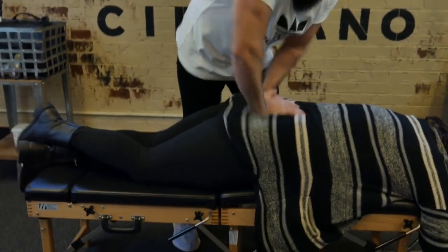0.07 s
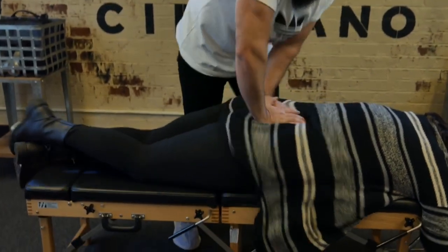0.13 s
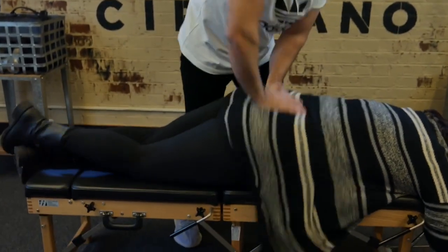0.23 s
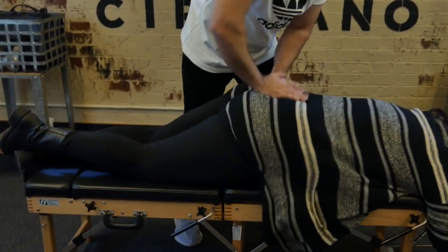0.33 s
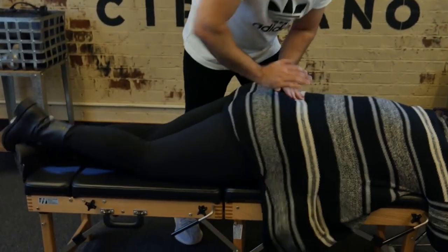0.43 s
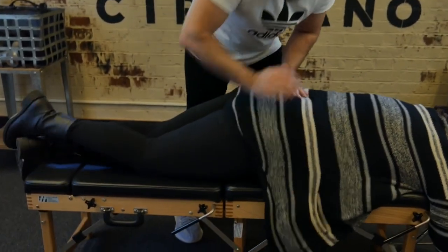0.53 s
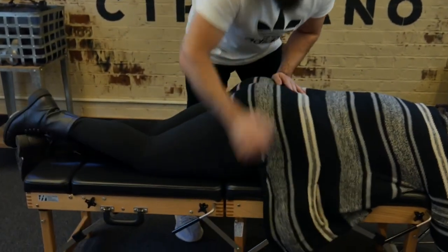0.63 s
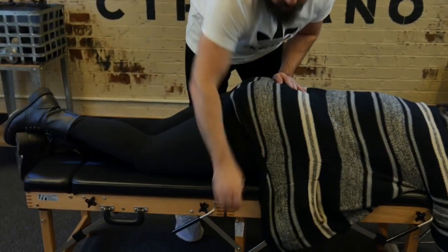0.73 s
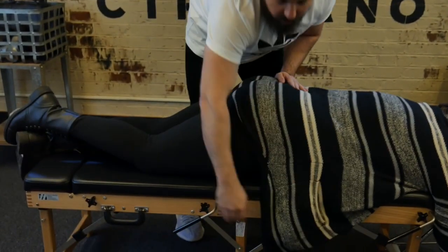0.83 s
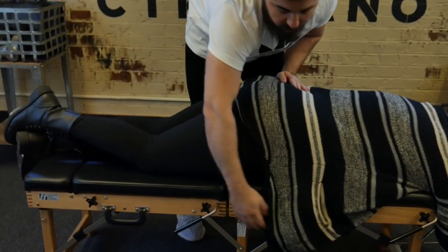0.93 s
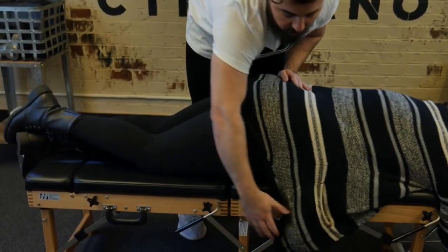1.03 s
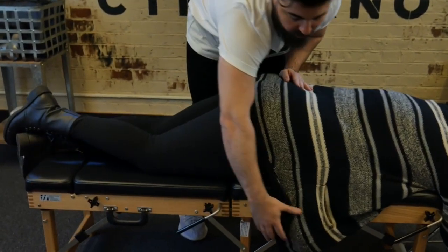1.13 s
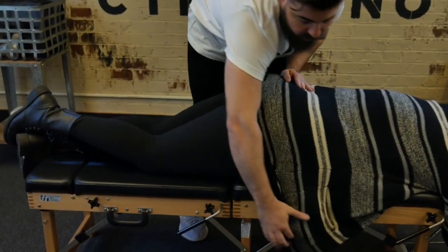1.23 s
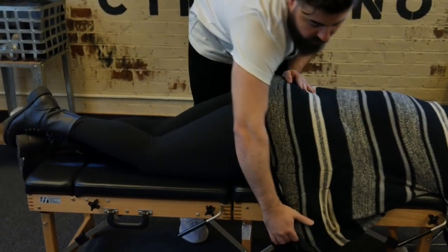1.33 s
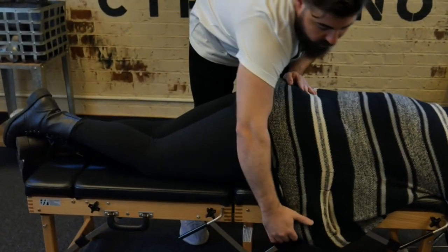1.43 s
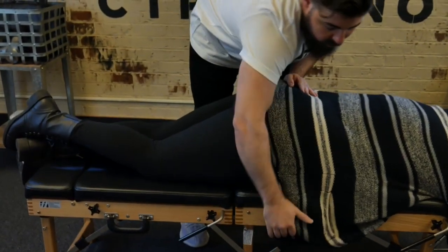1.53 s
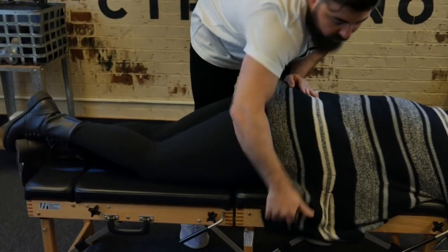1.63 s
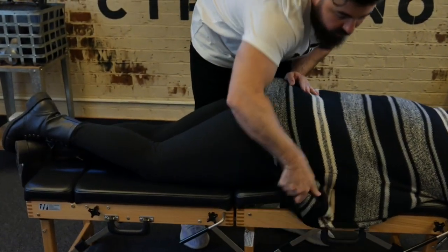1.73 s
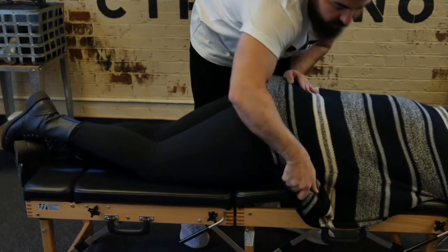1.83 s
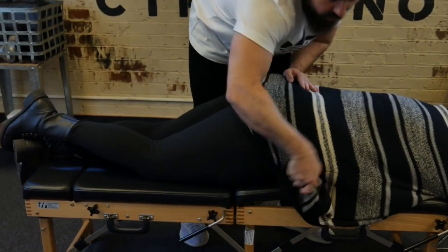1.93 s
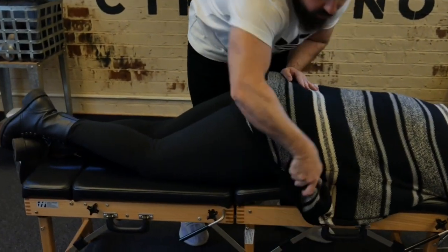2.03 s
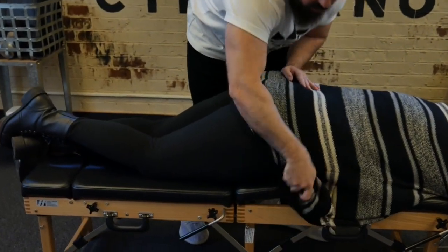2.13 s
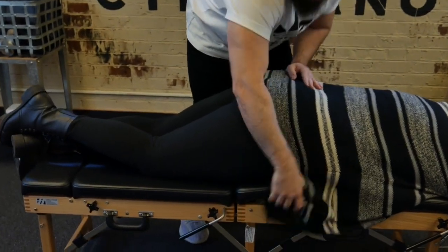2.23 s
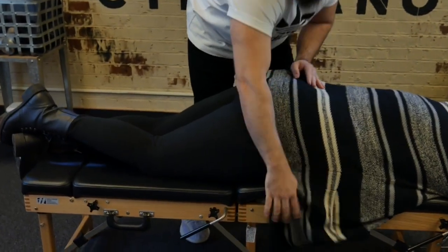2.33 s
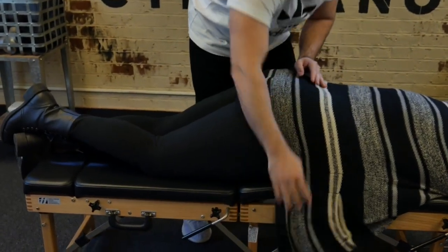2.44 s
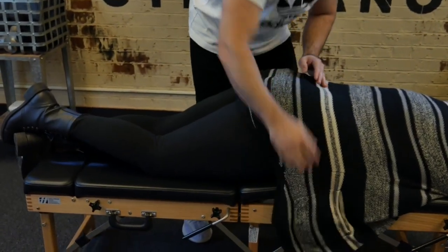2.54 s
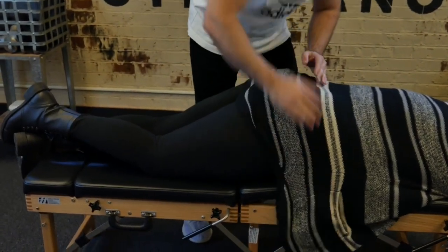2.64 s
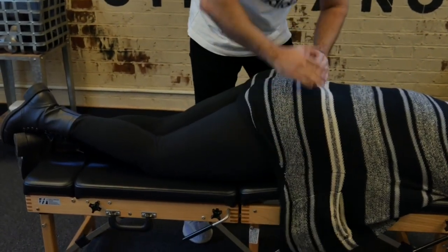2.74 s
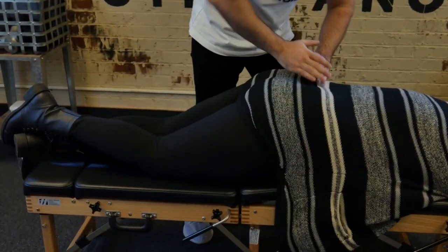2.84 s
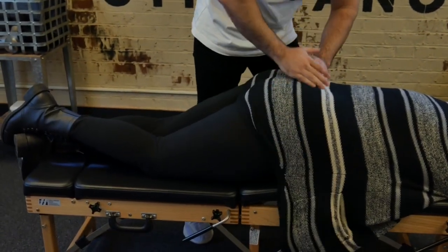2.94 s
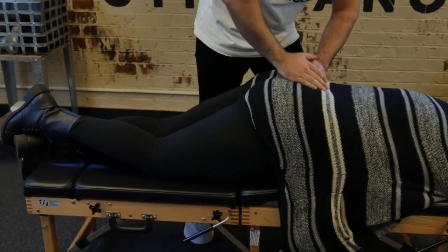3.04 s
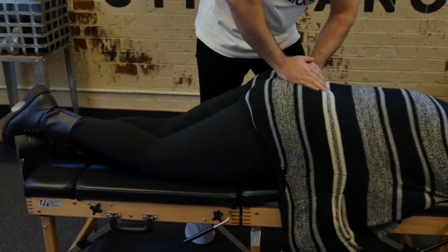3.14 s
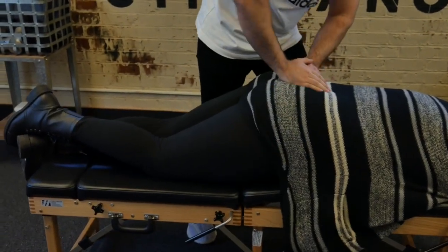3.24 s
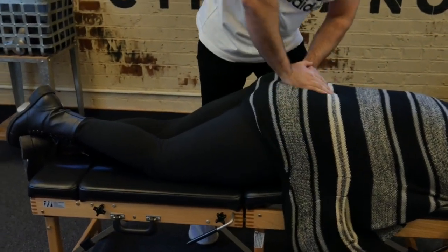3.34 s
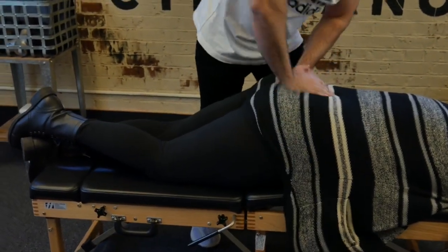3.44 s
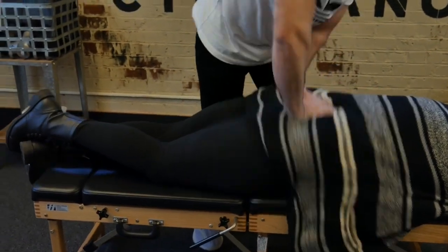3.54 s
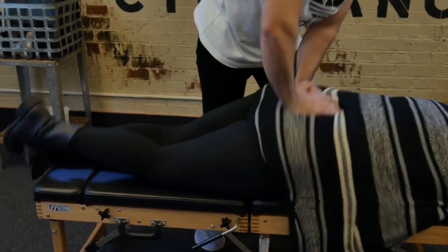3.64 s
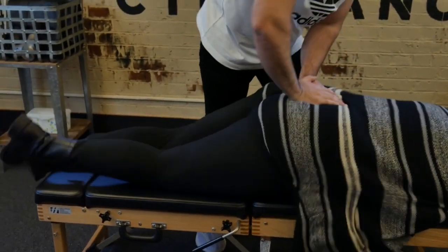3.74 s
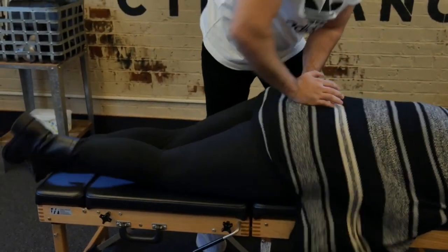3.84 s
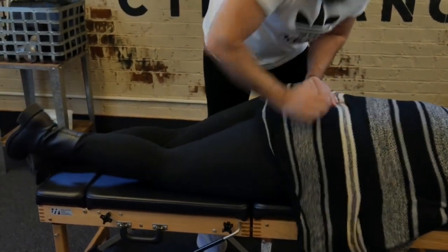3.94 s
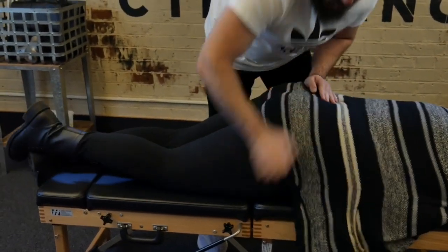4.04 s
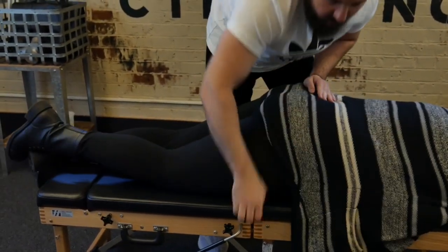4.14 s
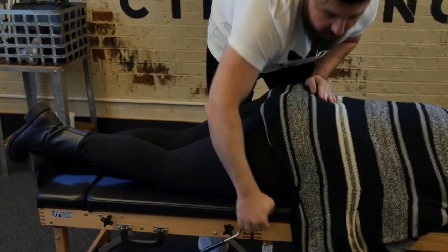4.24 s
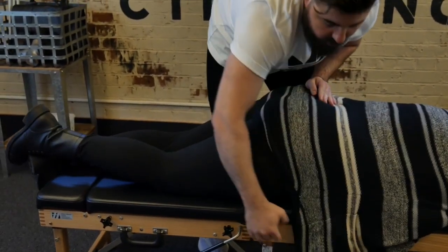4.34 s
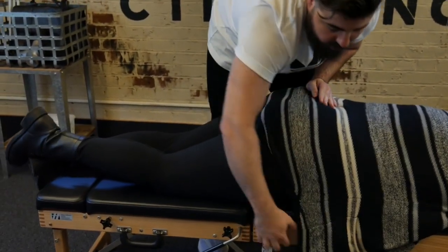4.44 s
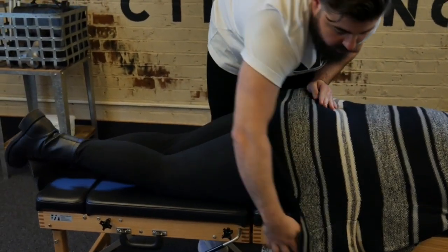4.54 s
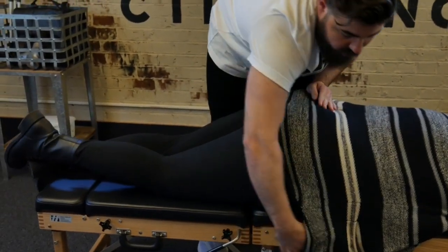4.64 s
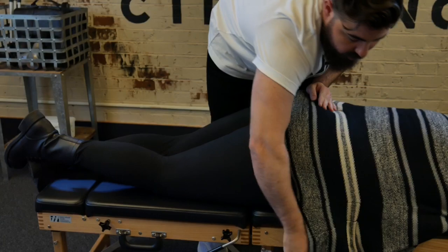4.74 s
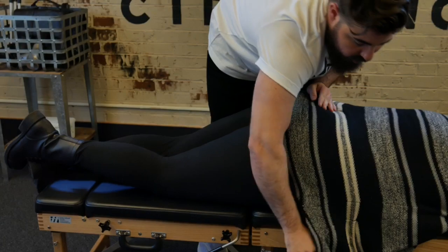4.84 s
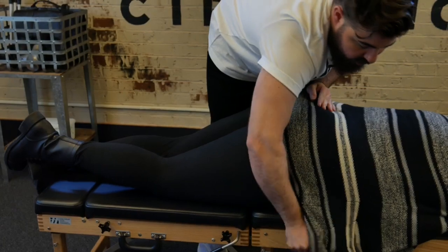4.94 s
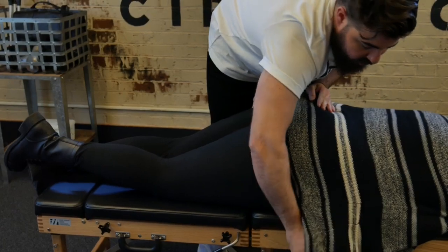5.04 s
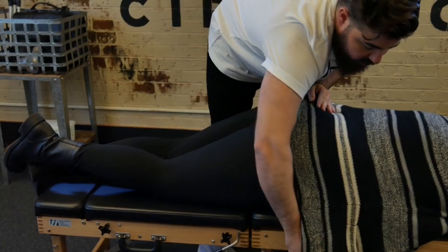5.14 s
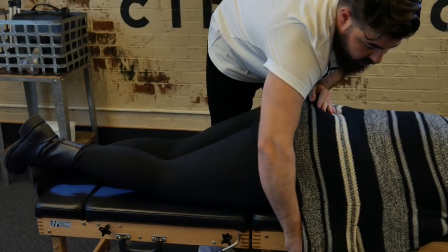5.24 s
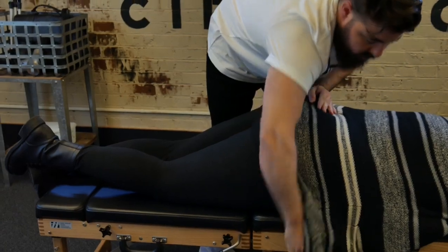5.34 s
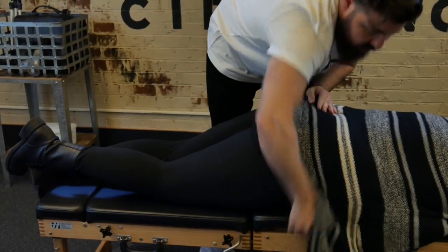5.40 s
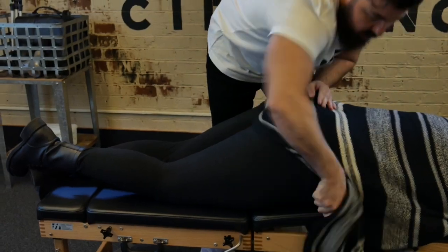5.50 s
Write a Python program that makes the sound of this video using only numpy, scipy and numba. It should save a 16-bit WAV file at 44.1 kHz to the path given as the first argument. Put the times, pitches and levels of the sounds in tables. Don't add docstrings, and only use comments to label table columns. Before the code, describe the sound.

A padded wooden table section drops twice with hard clacking slams, with lever clicks, frame rattles and a final steel latch snap between echoes.

```python
import sys
import numpy as np
from scipy import signal
from scipy.fft import rfft, irfft
from scipy.io import wavfile
from scipy.ndimage import uniform_filter1d
from numba import njit

SR = 44100
rng = np.random.default_rng(int(sys.argv[2]) if len(sys.argv) > 2 else 0)


def nominal_scale(level):
    x = np.asarray(level, float) / 20
    return 10 ** x


def to_wav(sig):
    pcm = np.clip(np.atleast_2d(sig), -1, 1) * 32767
    pcm = np.round(pcm).astype(np.int16)
    wavfile.write(sys.argv[1], SR, pcm.T)


N = 245637


def shape(table, hz):
    columns = np.array(table)
    return np.interp(np.log(hz), np.log(columns[:, 0]), columns[:, 1])


def unit(x):
    return x / np.sqrt(np.mean(x ** 2))


def band(x, hz, width_hz):
    return signal.lfilter(*signal.iirpeak(hz, hz / width_hz, fs=SR), x)


def walk(rate_hz):
    hold = int(SR / rate_hz)
    steps = np.repeat(rng.standard_normal(N // hold + 1), hold)
    return uniform_filter1d(uniform_filter1d(steps, hold), hold)[:N]


# (frequency [Hz], density [dB per Hz])
AIR_SPECTRUM = [(18, -45), (30, -5), (98, -13), (127, -12), (210, 3.5), (245, -24), (280, -37), (355, -45),
                (499, -12), (616, -7), (866, -11), (1500, -10.5), (4650, -31.5), (12300, -43), (16000, -38)]
# (frequency [Hz], width [Hz], level [dB])
DUCT_MODES = [(102.3, 16, -53), (259.7, 13.4, -52.5), (348.8, 10, -56), (450.8, 20, -59), (606, 13, -59.5)]


def ventilation(flicker_db, wobble_db):
    air_db, trim_db = -50, -2.5
    air = np.zeros(N)
    for hz in 32 * 2 ** (np.arange(28) / 3):
        noise = band(band(rng.standard_normal(N), hz, hz / 3), hz, hz / 3)
        air += nominal_scale(shape(AIR_SPECTRUM, hz) + flicker_db * walk(14)) * noise
    hum = np.zeros(N)
    for hz, width_hz, db in DUCT_MODES:
        hum += nominal_scale(db + wobble_db * walk(5.14)) * unit(band(rng.standard_normal(N), hz, width_hz))
    return (nominal_scale(air_db) * unit(air) + hum) * nominal_scale(trim_db)


# (frequency [Hz], T60 [s])
ROOM_DECAY = [(70, 1), (150, 1), (250, 1), (500, 0.89), (1100, 0.72), (2500, 0.54), (5000, 0.36),
              (9000, 0.38), (14000, 0.16)]
# (frequency [Hz], level [dB])
ROOM_SPECTRUM = [(70, -17.5), (150, -36.5), (250, -4), (500, 6), (1100, 2.5), (2500, 0.5), (4500, -5.5),
                 (6500, 1), (7800, -3), (14000, 2)]
# (frequency [Hz], width [Hz], level [dB], T60 [s])
STANDING_WAVES = [(75, 13, 7, 1), (166.3, 37, 2.5, 0.79), (217, 20, -4.5, 1), (254.2, 16, 9, 1),
                  (425, 32, 13.5, 0.56)]


def room(x, level_db, gap_s, build_s):
    t = np.arange(3 * SR // 2) / SR
    tail = np.zeros(len(t))
    for hz in 50 * 2 ** (np.arange(26) / 3):
        decay_db = shape(ROOM_SPECTRUM, hz) - 60 * t / shape(ROOM_DECAY, hz)
        tail += nominal_scale(decay_db) * band(rng.standard_normal(len(t)), hz, hz / 4)
    for hz, width_hz, db, t60_s in STANDING_WAVES:
        tail += nominal_scale(db - 60 * t / t60_s) * band(rng.standard_normal(len(t)), hz, width_hz)
    tail *= 1 - np.exp(-np.maximum(t - gap_s, 0) / build_s)
    return nominal_scale(level_db) * signal.fftconvolve(x, tail)[:N]


# (peak time [s], rise per 20 dB [s], fall per 20 dB [s], hiss [dB], dull re hiss [dB])
CLOTH_RUBS = [(0.108, 0.082, 0.0053, -63, 20.5), (0.908, 0.14, .16, -63, -1), (1.15, .4, 0.91, -67.5, 3.5),
              (1.64, .05, 0.44, -81, 18), (3.3, 1, 0.9, -89, 24.5), (3.535, 0.06, 0.0038, -66.5, 25),
              (4.284, 0.067, 0.046, -64, 5.5), (4.474, .04, 0.23, -72, 0), (4.77, 0.46, .05, -63, -2.5)]


def cloth(grit):
    t, gain = np.arange(N) / SR, np.zeros((2, N))
    for peak_s, rise_s, fall_s, hiss_db, dull_db in CLOTH_RUBS:
        rub = nominal_scale(hiss_db - 20 * np.maximum((peak_s - t) / rise_s, (t - peak_s) / fall_s))
        gain += [rub, rub * nominal_scale(dull_db)]
    clumps = np.exp(grit * uniform_filter1d(rng.standard_normal(N), size=40))
    grains = rng.standard_normal((2, N)) * clumps
    hiss = unit(band(band(grains[0], 10500, 16000), 10500, 16000))
    scrape = unit(band(grains[1], 2250, 2200))
    return gain[0] * hiss + gain[1] * scrape


PART_HZ = [200, 850, 3000, 8500]


def blows(table, modes, rise_s, chatter_s, grit, top_hz, drive_db, room_db, size=6144):
    t, hz = np.arange(size) / SR, np.fft.rfftfreq(size, 1 / SR) + 1
    burst = (1 - np.exp(-t / rise_s)) * np.exp(-t / chatter_s)
    masks = np.array([np.interp(np.log(hz), np.log(PART_HZ), row) for row in np.eye(len(PART_HZ))])
    masks *= hz ** 2 / (hz ** 2 + 105 ** 2)
    masks /= np.sqrt(1 + (hz / top_hz) ** 2)
    lead = size // 8
    out = np.zeros((2, N + size))
    for time_s, knock_db, thump_db, click_db, sizzle_db in table:
        noise, spikes, spot = rng.standard_normal((3, size))
        ring = 1. * (np.arange(size) == lead)
        for k, (mode_hz, width_hz, db) in enumerate(modes):
            tuned_hz = mode_hz * (1 + 0.0075 * spot[-k - 1])
            ring = ring + (nominal_scale(db + 1.9 * spot[k]) - 1) * band(ring, tuned_hz, width_hz)
        clean = irfft(rfft(ring) * masks)
        contacts = burst * noise * np.exp(grit * spikes)
        parts = irfft(rfft(clean) * rfft(contacts))
        parts[0] = np.roll(clean[0], int(2 * rise_s * SR))
        levels = nominal_scale(knock_db + drive_db + np.array([thump_db, 0, click_db, sizzle_db]))
        peaks = np.sqrt(uniform_filter1d(parts ** 2, size=176).max(axis=1))
        parts *= (levels / peaks)[:, None]
        clean *= np.sqrt(np.sum(parts ** 2, axis=1) / np.sum(clean ** 2, axis=1))[:, None]
        i = int((time_s - rise_s) * SR)
        out[:, i:i + size] += [parts.sum(axis=0), (nominal_scale(room_db) * clean.T).sum(axis=1)]
    return out[:, lead:N + lead]


# (time [s], knock peak [dB], thump, click, sizzle re knock [dB])
RAIL_KNOCKS = [(0.96, -48, 14, -24, -30), (1.03, -50, 11, -22, -30), (4.5, -52, 6, -28, -30),
               (1.704, -40, 14, -23, -14), (1.743, -36, 1.5, -10, -27), (1.969, -21, 2.5, -7, -20),
               (1.977, -34.5, -26, 5, -7.5), (2.141, -24.5, 3.5, -7.5, -28), (4.191, -38, 9.5, -5, -10.5),
               (5.216, -41, 6, -20, -36)]
# (frequency [Hz], width [Hz], gain over plain crack [dB])
RAIL_MODES = [(330, 83, 5), (500, 31, 4.5), (1206, 340, 6.6), (1630, 79, 1), (3500, 400, 8)]


def rail_knocks():
    return blows(RAIL_KNOCKS, RAIL_MODES, rise_s=0.00149, chatter_s=0.0076, grit=0.18,
                 top_hz=6000, drive_db=-11, room_db=1.1)


# (time [s], knock peak [dB], thump, click, sizzle re knock [dB])
LEVER_BLOWS = [(0.055, -34.5, 1, -4.5, -21), (1.555, -41.5, -11, 2.5, -5), (1.598, -35, -13, 2, -11),
               (1.837, -37.5, -45, 6.5, -13), (3.502, -38.5, 4, 5.5, -33), (4.456, -39.5, -11, -17, -6),
               (5.369, -41, -13, 1, 0), (5.382, -39.5, 7.5, 4.5, -6), (5.391, -28, -12, -9.5, -12)]
# (frequency [Hz], width [Hz], gain over plain crack [dB])
PIN_MODES = [(1330, 270, 2.5), (1810, 14, 14), (2900, 900, 6.1), (3650, 490, 12), (5400, 170, 1.5),
             (5900, 930, 10)]


def cocking_lever():
    return blows(LEVER_BLOWS, PIN_MODES, rise_s=0.00046, chatter_s=0.0033, grit=0.54,
                 top_hz=6960, drive_db=-7, room_db=3.2)


# (time [s], knock peak [dB], thump, click, sizzle re knock [dB])
HANDLE_BUMPS = [(1.476, -24.5, -4, -20, -45), (1.486, -25.5, 0.5, -22, -41), (1.509, -38, 4, -21, -31),
                (5.322, -29.5, 0, -5, -15.5), (5.334, -18.5, -2.5, -21, -44), (5.351, -32.5, 2, -15, -21)]
# (frequency [Hz], width [Hz], gain over plain crack [dB])
GRIP_MODES = [(156, 35, 14.4), (440, 190, 2.5), (860, 220, 3.5), (1210, 74, 8.4), (1360, 160, 11.5),
              (2400, 200, 3.7), (3630, 73, 13)]


def handle_bumps():
    return blows(HANDLE_BUMPS, GRIP_MODES, rise_s=0.002005, chatter_s=0.0089, grit=0.18,
                 top_hz=4500, drive_db=-11, room_db=0.0)


# (time [s], knock peak [dB], thump, click, sizzle re knock [dB])
FRAME_RATTLES = [(2.285, -20.5, -5, -8.5, -54), (2.299, -28, 3, -12, -32), (2.413, -12.5, -17, -0.5, -26),
                 (2.428, -13.5, 2.5, -18, -33), (2.449, -17, -2, -16, -36), (2.634, -18, -27, -5, -49),
                 (2.642, -10.5, -5, -8.5, -32), (2.798, -25, -34, -11.5, -28), (2.809, -12, -6, -15, -50),
                 (2.859, -35, 3, -52, -49), (2.924, -27, 5, -12, -30), (2.942, -19.5, -21, -22, -48),
                 (3.005, -37.5, 11.5, -5, -42), (3.087, -33, -28, -10, -34)]
# (frequency [Hz], width [Hz], gain over plain crack [dB])
FRAME_MODES = [(125, 11.5, 7), (169, 46, 8.3), (450, 190, 5.5), (738, 42, 12.2), (914, 47, 4.6),
               (1158, 154, 9.9), (1362, 87, 9.3), (1782, 52, 10.4), (2290, 270, 9.6), (2910, 200, 2.9),
               (3240, 850, 6.5), (5880, 160, 5.3)]


def frame_rattle():
    return blows(FRAME_RATTLES, FRAME_MODES, rise_s=0.002, chatter_s=0.011, grit=0.074,
                 top_hz=3500, drive_db=-11, room_db=2.0)


# (time [s], knock peak [dB], thump, click, sizzle re knock [dB])
LATCH_SNAPS = [
    (5.486, -20, -9, 5, -4.5),
    (5.499, -11.5, -2, 2, -1),
]
# (frequency [Hz], width [Hz], gain over plain crack [dB])
STEEL_MODES = [(325, 180, 12), (1550, 130, 2.6), (2240, 100, 1.7), (2690, 230, 4.7), (3900, 140, 4.3),
               (5100, 120, 2.6), (5400, 720, 10.4), (10200, 240, 9.6)]


def latch():
    return blows(LATCH_SNAPS, STEEL_MODES, rise_s=0.00128, chatter_s=0.0045, grit=0.39,
                 top_hz=7000, drive_db=-8.0, room_db=1.1)


# (time [s], level [dB])
PAD_RELEASES = [
    (0.1094, 0),
    (3.5356, 0),
]
# (frequency [Hz], width [Hz], gain over plain crack [dB])
PAD_MODES = [(130, 36, 7), (208, 41, 5.5), (360, 27, 2), (457, 580, 7.5), (1086, 310, 5.5), (1594, 320, 5),
             (2700, 790, -0.5), (3730, 56, 6.5), (8060, 900, -3)]


def shudder(grit, top_hz):
    level_db, peak_s = -34, 0.23
    rise_s, fall_s = 1, 0.15
    clumps = np.exp(grit * unit(uniform_filter1d(rng.standard_normal(N), size=90)))
    jolts = rng.standard_normal(N) * clumps
    top_cut = signal.butter(3, top_hz, fs=SR, output="sos")
    ring = signal.sosfilt(top_cut, band(jolts, 770, 2200))
    for hz, width_hz, db in PAD_MODES:
        ring = ring + (nominal_scale(db) - 1) * band(ring, hz, width_hz)
    age = np.arange(N) / SR - np.array(PAD_RELEASES)[:, :1]
    swell = nominal_scale(level_db - 20 * np.maximum((peak_s - age) / rise_s, (age - peak_s) / fall_s))
    return unit(ring) * (swell * (age > 0)).sum(axis=0)


# (delay [s], knock peak [dB], thump, click, sizzle re knock [dB])
DROP_STAGES = [
    (0.0004, -19.5, -16, 3.5, -14),
    (0.0035, -13, 20, -3, -2.5),
    (0.0104, -24, 9, -4, -6),
    (0.018, -3.5, -47, -3.5, -13),
    (0.023, -20, 9, -8, -34.5),
]
# level [dB]; a strong, bright echo
DROP_ROOM_DB = [3.45, 6.3, 12.4, 7]


def pad_drops():
    stages = []
    for release_s, db in PAD_RELEASES:
        for delay_s, knock_db, *colour in DROP_STAGES:
            stages.append((release_s + delay_s, db + knock_db, *colour))
    return blows(stages, PAD_MODES, rise_s=0.0008, chatter_s=0.0021, grit=0.97,
                 top_hz=5860, drive_db=-9.5, room_db=np.array(DROP_ROOM_DB))


def scene():
    air = ventilation(flicker_db=1.5, wobble_db=2.2)
    rustle = cloth(grit=0.58)
    contacts = rail_knocks() + cocking_lever() + handle_bumps() + frame_rattle() + latch() + pad_drops()
    shaking = shudder(grit=0.42, top_hz=3900) * nominal_scale([[-0.5], [-12]])
    direct, feed = contacts + shaking
    echo = room(feed, level_db=-36.5, gap_s=0.0024, build_s=0.012)
    return (direct + echo + rustle + air)[None]


@njit
def follow(x, up, down):
    y, e = np.empty(len(x)), 0.
    for i in range(len(x)):
        e += (x[i] - e) * (up if x[i] > e else down)
        y[i] = e
    return y


def gain_control(dry):
    knee_db, ratio = -21, 9
    attack_s, release_s, react_s = 0.0095, 0.018, 0.03
    power = follow(dry[0] ** 2, 1 / (attack_s * SR), 1 / (release_s * SR))
    level = np.sqrt(power + 1e-12)
    t = np.arange(N) / SR
    late_level = np.interp(t - react_s, t, level)
    return dry * np.minimum(1, nominal_scale(knee_db) / late_level) ** (1 - 1 / ratio)


def band_limit(x):
    return signal.sosfilt(signal.butter(12, 16180, fs=SR, output="sos"), x)


def record(dry):
    rounded = np.tanh(1.157 * gain_control(dry)) / np.tanh(1.1)
    top_cut = signal.cheby1(8, 1, 15000, fs=SR, output="sos")
    return band_limit(signal.sosfilt(top_cut, rounded))


dry = scene()
out = record(dry)
to_wav(out)
```